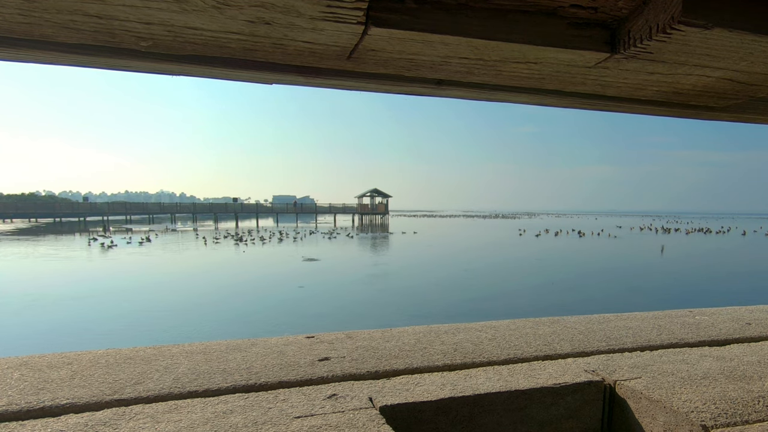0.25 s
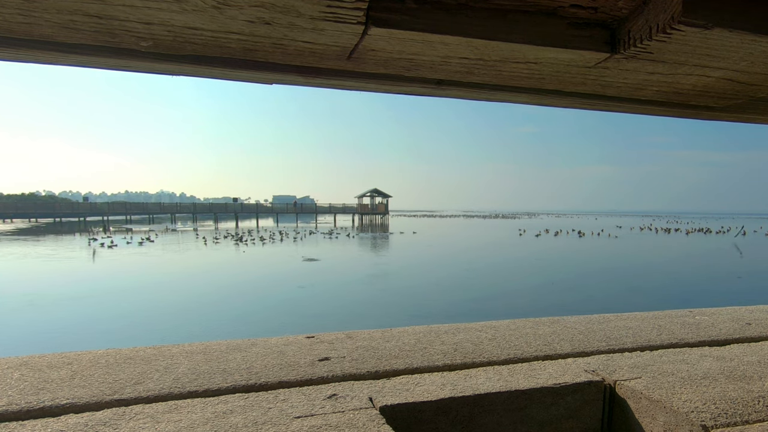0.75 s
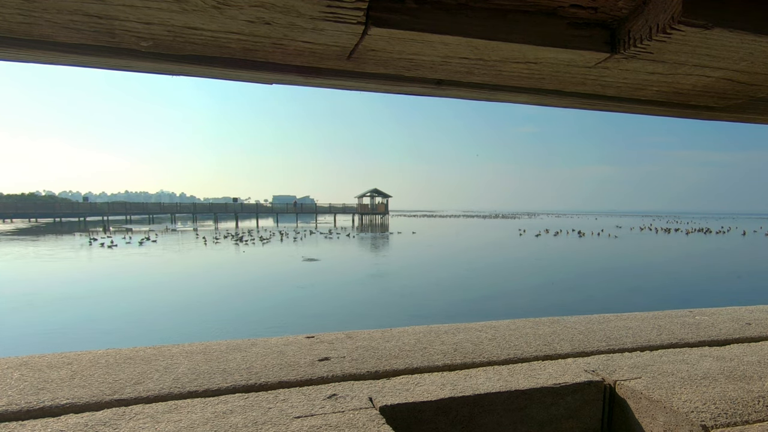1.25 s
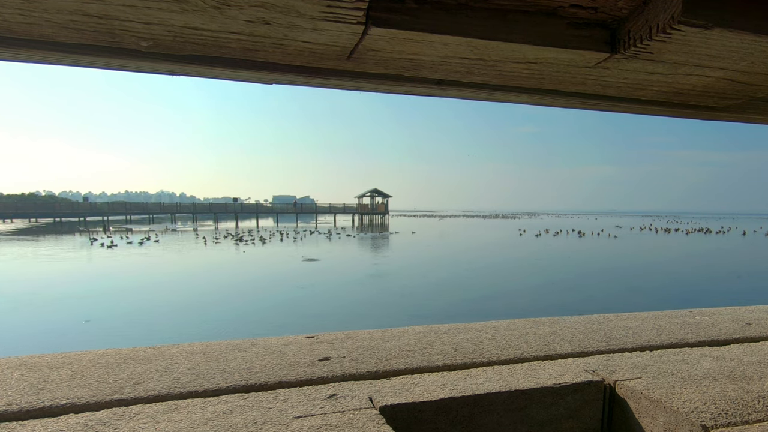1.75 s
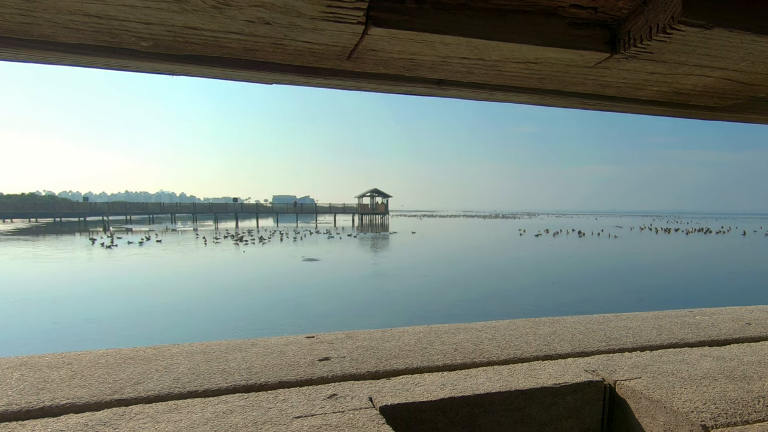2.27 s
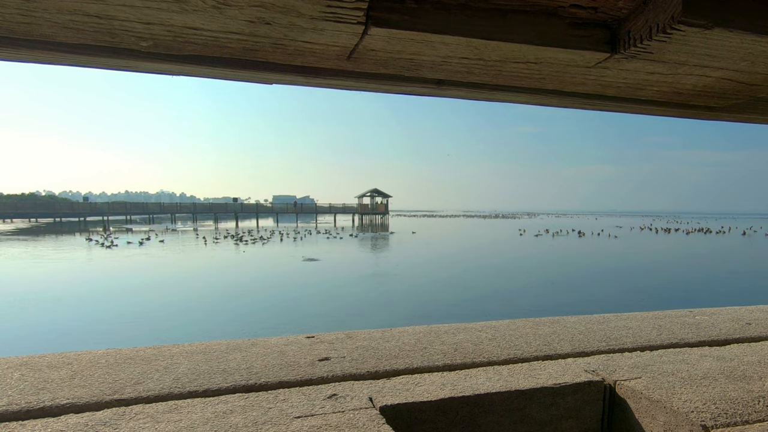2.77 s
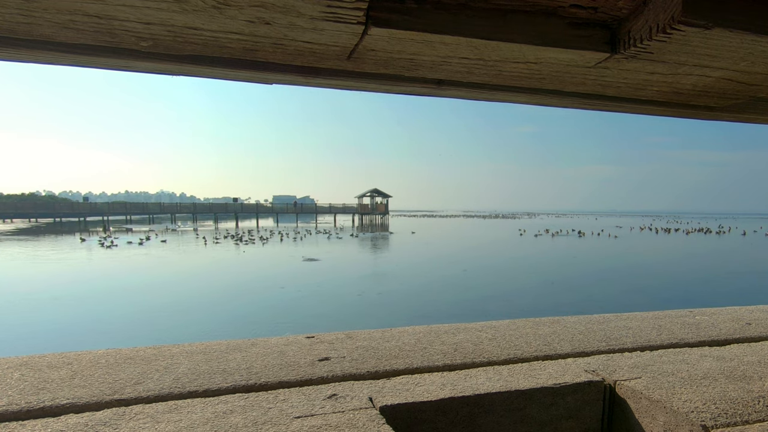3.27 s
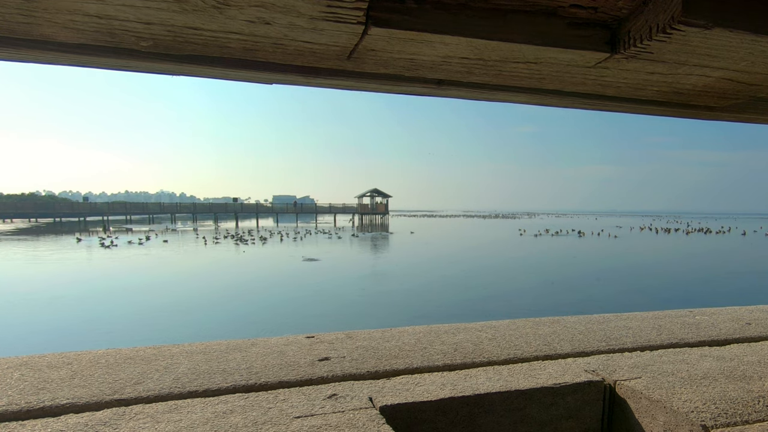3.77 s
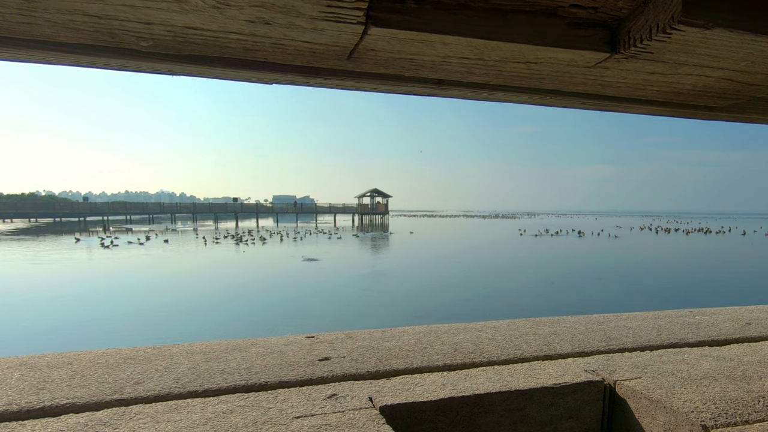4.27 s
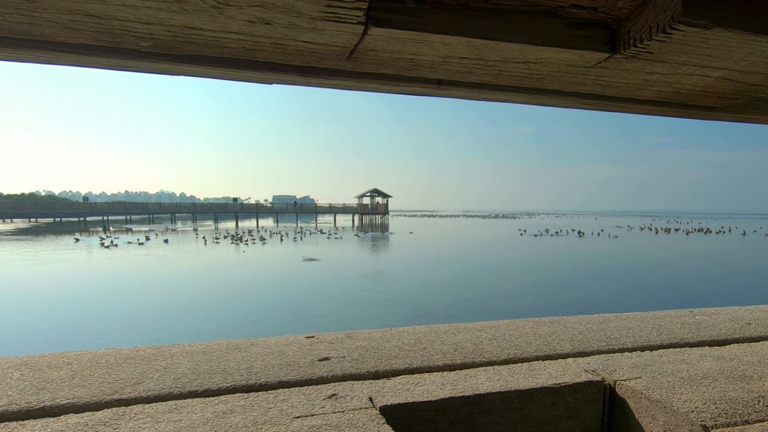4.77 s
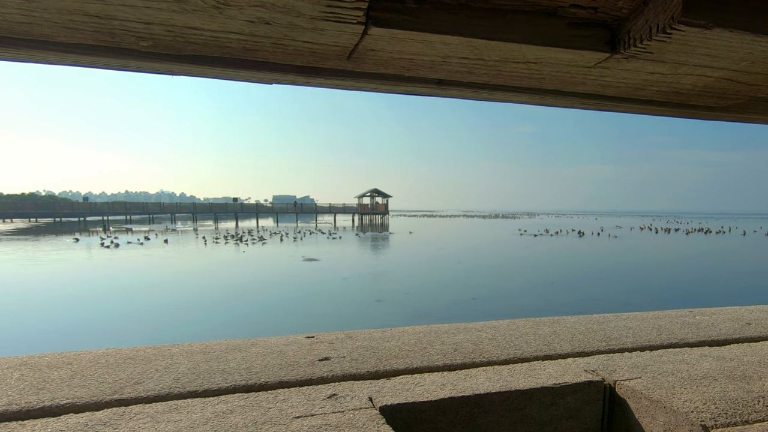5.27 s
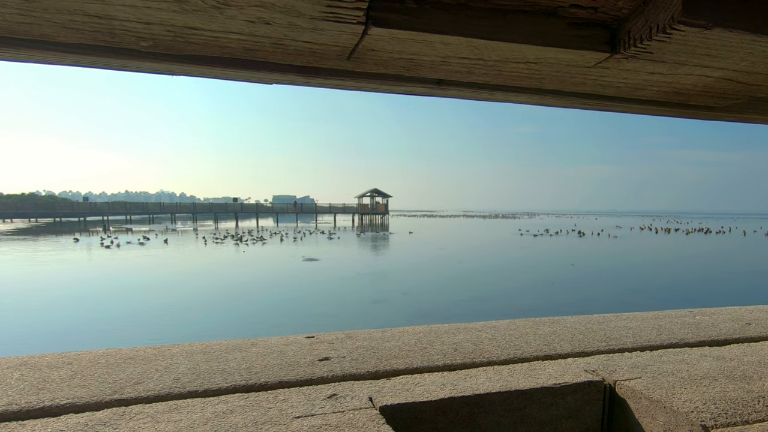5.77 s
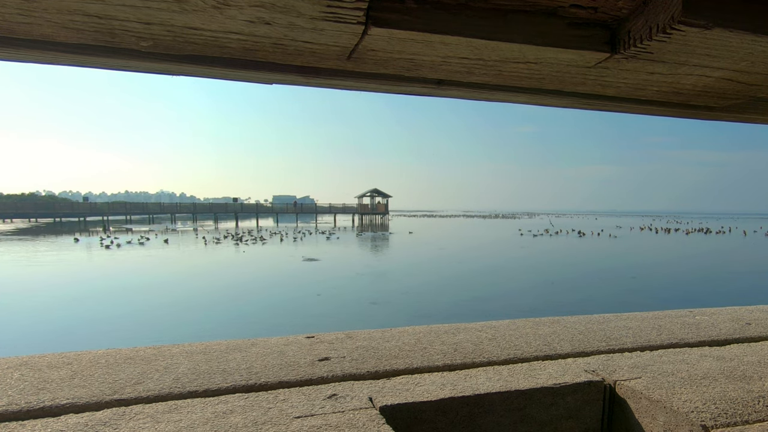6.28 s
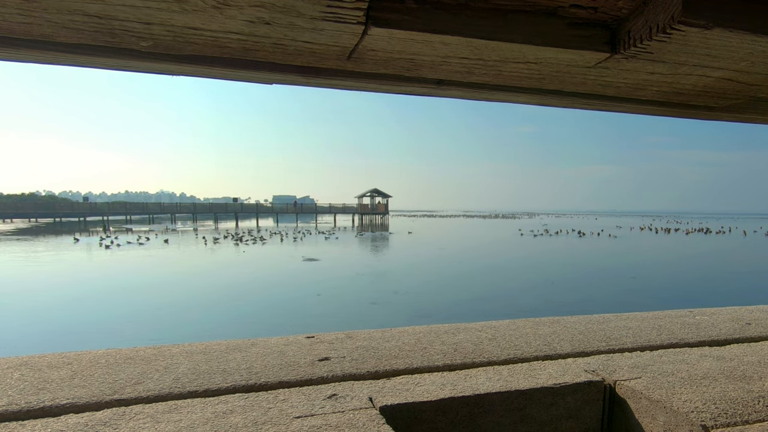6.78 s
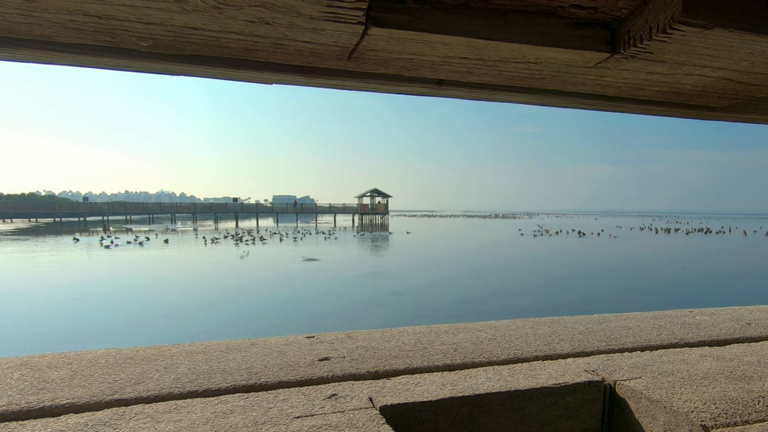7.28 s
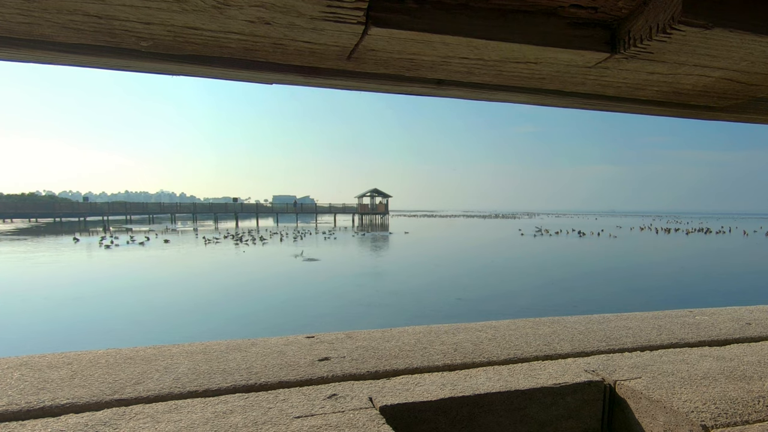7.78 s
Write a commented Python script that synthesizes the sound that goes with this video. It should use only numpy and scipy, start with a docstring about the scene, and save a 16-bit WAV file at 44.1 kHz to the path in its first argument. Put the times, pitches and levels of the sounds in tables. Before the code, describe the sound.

A low, far engine hum and rumble holds steady beneath an outdoor lagoon. Early on, a whistle with a squeak, a nasal mew and a rough two-part bird cry sound nearby, with slight echo. Timber close by ticks dryly from about two and a half to five seconds while a far motor rises in pitch. Later come three weak croaks, a thin gliding whistle and a single crisp snap. Gentle hiss and air sway continue.

```python
"""A calm lagoon, heard from a wooden shelter: water birds honk, mew, whistle and croak, built from wavering harmonics.
A run of dry ticks, like creaking timber, passes in the middle: short noise bursts strike resonances. Later comes one snap.
A distant engine drones as sine tones over low noise, and a far motor rises in pitch for a moment.
Light air sways on the microphone as very slow noise, with the even hiss of open water."""
import sys
import numpy as np
from scipy import signal
from scipy.fft import rfft, irfft
from scipy.io import wavfile
from scipy.ndimage import uniform_filter1d, map_coordinates

SR = 44100
rng = np.random.default_rng(int(sys.argv[2]) if len(sys.argv) > 2 else 0)


def store_wav(level_fs):
    """Save 16-bit WAV to argv[1]."""
    pcm = np.round(np.clip(np.atleast_2d(level_fs), -1, 1) * 32767)
    wavfile.write(sys.argv[1], SR, pcm.T.astype(np.int16))


N = 354299
TIME = np.arange(N) / SR  # seconds

# Bird notes, each one arch of pitch and breath. Each row: start in seconds, length in seconds, first, middle
# and last pitch in Hz, relative level in dB, fade over the note in dB, roughness from 0 to 1, voice name.
NOTES = [(0, 0.073, 420, 416, 432, -58.5, 1.5, 0.02, "nasal"),
         (0.079, 0.094, 474, 516, 530, -59.5, 8, 0.3, "yodel"),
         (0.087, 0.11, 2385, 2205, 2280, -46, 3.5, 0.22, "whistle"),
         (.14, 0.37, 720, 727, 653, -60.5, -1, 0.27, "mew"),
         (0.199, 0.11, 3753, 3714, 3700, -54, 10, 0.26, "squeak"),
         (1.336, 0.017, 464, 483, 503, -56, 0, .3, "yelp"),
         (1.36, 0.0455, 514, 515, 457, -40, 7, 0.22, "yelp"),
         (1.397, 0.07, 391, 352.4, 390, -56, 5, .4, "rasp"),
         (1.451, .122, 466, 492.4, 443, -45.5, 2, 0.15, "wail"),
         (1.62, .43, 1367, 1636, 1790, -57.5, 4, 0.45, "thin"),
         (2.185, 0.035, 454, 477, 463, -49.5, 3, 0.44, "honk"),
         (2.636, 0.15, 2005, 2195, 2250, -47, 8.5, 0.24, "whistle"),
         (2.772, 0.14, 3706, 3686, 3686, -54, 7, 0.1, "squeak")]
# Bird voices. Each list: relative level of harmonics 1, 2, 3 and so on, in dB.
NASAL_VOICE = [-9, -8, 1, 3, -6, -22, -7, -14]
YODEL_VOICE = [-17, 1, -22, -3, -24, -6]
HONK_VOICE = [-16, -3, 3, -2.5, -10, -12, -10, -30]
YELP_VOICE = [-26, -18, -20.5, -4, -20, -14, -21, -30, -28, -31, -33, -32]
RASP_VOICE = [-11, -9, -6, -10, -1.5, -5, -7, -3.5, -6, -20, -10, -14, -20, -26]
WAIL_VOICE = [-32, -8.5, -19, -1, -22, -11.5, -21, -21, -30, -21, -38, -15, -36, -33, -36, -31, -42, -24]
MEW_VOICE = [-14, 3.5, 5, -4, -14, -2, -20]
THIN_VOICE = [-0.5, -2.5, -40, -9]
WHISTLE_VOICE = [0.5, -15, -24.5, -31]
SQUEAK_VOICE = [-2.2, -6.5]
CROAK_VOICE = [-0.5, -1, -4, -6, -8, -12, -7, 0]
PURE_VOICE = [0]  # one harmonic only
# Throat resonances of the long mew, the rising mew and the croak.
# Each row: pitch in Hz, width in Hz, relative level in dB.
MEW_THROAT = [(1400, 70, 2.5), (2940, 310, 2.5), (4100, 630, -2.5)]
RISING_THROAT = [(1687, 47, 4.5), (3160, 1800, 2)]
CROAK_THROAT = [(563, 220, -2), (975, 190, 1.5), (2670, 500, -6)]
# Far croaks. Each row: start in seconds, length in seconds, top pitch in Hz, relative level in dB.
CROAKS = [(6.082, 0.063, 619, -48.5), (6.275, 0.084, 520.6, -53), (6.654, .085, 545.5, -50)]
# Two faint gliding whistles. Each row of a glide: time in seconds, pitch in Hz, relative level in dB.
GLIDES = [
    [(.5, 1440, -71), (.9, 1550, -84), (1.3, 1614, -70), (1.8, 1689, -69)],
    [(4.9, 1380, -72), (5.5, 1507, -73.5), (5.9, 1600, -69.5), (6.2, 1657, -69), (6.45, 1670, -75),
     (6.7, 1556, -67), (6.95, 1400, -78)],
]
# Echoes off the shelter and shore. Each row: delay in seconds, level in dB.
ECHOES = [(.004, -25), (0.019, -16), (.047, -14)]
# Strong timber ticks. Each row: time in seconds, relative level in dB, treble against the middle in dB.
STRONG_TICKS = [(2.4185, -51.5, -15), (2.5305, -43.5, -10), (2.6206, -46, -6), (2.716, -40.5, -10),
                (2.899, -43, -8), (3.0854, -40.5, -9), (3.277, -41, -10), (3.3796, -45.5, -9),
                (3.4811, -37.5, -12.5), (4.0567, -44, -7), (4.3097, -42.5, -10), (4.3994, -44, -7),
                (4.4884, -44.5, -6), (4.5803, -42, -9.5), (4.7664, -38.5, -7), (4.863, -43, -4),
                (4.9558, -42.5, -3.5), (5.0555, -43, -9), (5.159, -45, -7), (5.2728, -48.5, -13)]
# What the timber rings with. Each row: pitch in Hz, width in Hz, relative level in dB.
TIMBER = [(606, 330, 6.5), (980, 790, 4.5), (1400, 330, 3.5), (2200, 490, 4), (3150, 1080, 0.5),
          (4800, 750, 2), (7650, 960, 0)]
# One bright snap: time in seconds, relative level in dB.
SNAP = (6.336, -18)
# Distant engine, losing speed. Each row: time in seconds, speed as a multiple of nominal.
ENGINE_SPEED = [(0, 1.04), (3, 1), (6, .993), (8, 0.96)]
# Its two strong lines, each swelling once. Each row: pitch in Hz at nominal speed, resting level in dB before
# the fade, swell in dB, time of the swell in seconds, its half-width in seconds.
ENGINE_LINES = [(199.8, -47.5, 5.5, 3.73, 0.87), (178.4, -50, 8.5, 7.84, 0.99)]
# Its steady lines. Each row: pitch in Hz, level in dB.
HUM = [(91.5, -51), (120, -51.5), (148, -55), (286, -69)]
# A far motor gathering speed. Each row: time in seconds, pitch in Hz, level in dB.
FAR_MOTOR = [(3.3, 236, -66), (4.2, 260, -55.5), (4.8, 271.5, -57.5), (5.3, 272, -83)]
# Colour of the engine's rumble. Each row: frequency in Hz, relative level per Hz in dB.
RUMBLE = [(25, -2.5), (33, -8), (55, -3.5), (85, -3), (125, -1), (160, -3), (195, -6.5), (230, -10.5),
          (290, -13.5), (360, -20.5), (450, -24.5), (700, -29.5), (900, -32)]
# Puffs of air on the microphone. Each row: time in seconds, peak strength in dB, half-width in seconds.
PUFFS = [(.35, -22.5, 0.31), (1.5, -31.5, 0.66), (2.7, -17, 0.26), (3.45, -30, 0.34), (6.75, -27.5, .25)]
# Colour of the water's hiss. Each row: frequency in Hz, relative level per Hz in dB.
HISS = [(400, -7.5), (700, 2), (1000, -0.5), (1400, -4.5), (2000, -6.5), (3000, -8.5), (5400, -12),
        (6200, -8), (6900, -13), (10000, -15), (15800, -19)]

# The breath of a note is this much weaker at its two ends.
SLACK_DB = 4
# A rough note also wavers in pitch and is breathy, in these shares of its roughness.
JITTER_SHARE, BREATH_SHARE = 0.013, 0.5
# A croak starts and ends at this share of its top pitch.
CROAK_END_SHARE = 0.79
# Weak ticks keep the beat between the strong ones; their levels are relative too.
TICK_PERIOD_S, WEAK_TICK_DB, WEAK_SPREAD_DB, WEAK_TREBLE_DB = 0.096, -50, 2.5, -7.5
# The timber rustles around each tick: relative level, and half-width in time.
STIRRING_DB, STIRRING_S = -21.5, 0.19
# The two strong lines sink as the engine draws away.
LINE_FADE_DB_PER_S = 0.46
# The rumble's level at the start, and how fast it recedes.
RUMBLE_DB, RECEDE_DB_PER_S = -42, 0.14
# The air's sway between puffs.
CALM_DB = -40
CUTOFF_HZ = 15900


def near_birds():
    """Rough nasal calls, mews shaped by a throat, and clean whistles that break into a higher squeak."""
    honks = notes("nasal", NASAL_VOICE) + notes("yodel", YODEL_VOICE)
    honks += notes("honk", HONK_VOICE, unsteady=1.3)

    # the cry drops into a low rasp between its two syllables
    cry = notes("yelp", YELP_VOICE, unsteady=1.1)
    cry += notes("rasp", RASP_VOICE, unsteady=1.7)
    cry += notes("wail", WAIL_VOICE, unsteady=1.6)
    # turbulence in the open bill follows the force of the cry, averaged over 50 ms
    force = np.sqrt(np.abs(uniform_filter1d(cry ** 2, size=2205)))
    turbulence = coloured([(900, 1), (1800, -3), (3200, -2), (4500, -16), (7000, -22)])
    cry += from_db(-13) * force * turbulence

    mews = throat(notes("mew", MEW_VOICE, unsteady=0.81), MEW_THROAT)
    # the rising mew's lowest harmonic grows strong as it climbs into a throat resonance
    mews += throat(notes("thin", THIN_VOICE, unsteady=0.94), RISING_THROAT)

    whistles = notes("whistle", WHISTLE_VOICE, unsteady=0.79)
    whistles += notes("squeak", SQUEAK_VOICE, unsteady=0.19)
    return honks + cry + mews + whistles


def far_birds():
    """Hoarse croaks arch in pitch and strength together; a thin gliding whistle sounds twice."""
    croaks = np.zeros(N)
    for start, length, top_hz, db in CROAKS:
        end_hz = CROAK_END_SHARE * top_hz
        curve = arch(start, length, [end_hz, top_hz, end_hz], db)
        croaks += call(curve, CROAK_VOICE, jitter=0.017, rasp=0.5, breath=0.39)
    whistles = sum(call(glide, PURE_VOICE, jitter=0.00712, rasp=0.38) for glide in GLIDES)
    return throat(croaks, CROAK_THROAT) + from_db(1.5) * whistles


def notes(name, voice, unsteady=1):
    """All notes sung in one voice; roughness sets flutter, waver and breath together."""
    out = np.zeros(N)
    for start, length, first, middle, last, db, fade_db, rough, sung in NOTES:
        if sung == name:
            curve = arch(start, length, [first, middle, last], db, fade_db)
            jitter = unsteady * JITTER_SHARE * rough
            out += call(curve, voice, jitter=jitter, rasp=rough, breath=BREATH_SHARE * rough)
    return out


def arch(start, length, pitches, db, fade_db=0):
    """One note as rows of time, Hz and dB: pitch bends through three points; breath swells, slackens and fades."""
    along = np.linspace(-1, 1, 25)
    seconds = start + length * (along + 1) / 2
    hz = np.polyval(np.polyfit([-1, 0, 1], pitches, 2), along)
    level_db = db - SLACK_DB * along ** 2 - fade_db * along / 2
    return np.column_stack([seconds, hz, level_db])


def call(curve, voice, jitter=0.003, rasp=0.1, breath=0.072, edge_s=0.005, wander=0.804):
    """A bird's voice organ: harmonics on one trembling, wandering pitch, each roughened by flutter and turbulence."""
    start, end = curve[0][0], curve[-1][0]
    span = (TIME > start - edge_s) & (TIME < end + edge_s)
    t = TIME[span]
    hz, db = in_time(curve, t)
    unsteady = drift(150, len(t)) + wander * drift(10, len(t))
    phase = 2 * np.pi * np.cumsum(hz * (1 + jitter * unsteady)) / SR
    tone = np.zeros(len(t))
    for k, level in enumerate(voice, 1):
        flutter = 1 + rasp * drift(120, len(t)) + breath * drift(700, len(t))
        tone += from_db(level) * np.sin(k * phase) * flutter
    # fade in and out so the edges do not click
    gate = np.clip((np.minimum(t - start, end - t) + edge_s) / (2 * edge_s), 0, 1)
    out = np.zeros(N)
    out[span] = np.sqrt(2) * tone * gate * from_db(db)
    return out


def throat(x, resonances):
    """A throat as resonances side by side, their signs alternating."""
    out = np.zeros(N)
    for k, (hz, width, db) in enumerate(resonances):
        out += (-1) ** k * from_db(db) * resonate(x, hz, width)
    return out


def tick_train():
    """The strong ticks, and weak ones evenly spaced in every gap: rows of time, dB and treble dB."""
    rows = list(STRONG_TICKS)
    for before, after in zip(STRONG_TICKS, STRONG_TICKS[1:]):
        beats = max(1, round((after[0] - before[0]) / TICK_PERIOD_S))
        for s in np.linspace(before[0], after[0], beats + 1)[1:-1]:
            db = WEAK_TICK_DB + WEAK_SPREAD_DB * rng.standard_normal()
            rows.append((s, db, WEAK_TREBLE_DB))
    return rows


def ticks(train, tick_db=27, top_hz=9500, crumble_s=0.0023, rattle_s=0.025, rattle_share=0.73):
    """Timber gives about ten times a second: a sharp slip, smaller ones and reflections strike its resonances."""
    s, db, treble_db = np.transpose(train)
    t = np.arange(3000) / SR
    clusters = np.zeros((len(s), len(t)))
    clusters[:, 0] = 0.75  # the sharp first slip
    for decay_s, share in [(crumble_s, 0.9), (rattle_s, rattle_share)]:
        burst = rng.standard_normal(clusters.shape) * np.exp(-t / decay_s)
        clusters += share * burst / np.linalg.norm(burst, axis=1, keepdims=True)
    at = (s * SR).astype(int)[:, None] + np.arange(len(t))
    out = np.zeros(N)
    for k, (hz, width, mode_db) in enumerate(TIMBER):
        # the treble setting acts only on resonances above 4 kHz
        strike_db = db + mode_db + treble_db * (hz > 4000)
        slips = np.zeros(N)
        slips[at] = clusters * from_db(strike_db)[:, None]
        out += (-1) ** k * resonate(slips, hz, width)
    soften = signal.butter(2, min(top_hz, 0.45 * SR), fs=SR, output="sos")
    return from_db(tick_db) * signal.sosfilt(soften, out)


def stirring(train):
    """Faint scattered grains around the ticks ring briefly at their own pitches; harder ticks stir more."""
    strain = np.sqrt(sum(from_db(db) ** 2 * swell(s, STIRRING_S) for s, db, _ in train))
    pitches = np.geomspace(400, 2000, 12)
    grains = (rng.random(N) < 400 / SR) * rng.standard_normal(N)  # about 400 a second
    dealt = rng.integers(0, len(pitches), N)  # which pitch each grain gets
    rustle = np.zeros(N)
    for k, hz in enumerate(pitches):
        rustle += resonate(grains * (dealt == k), hz, hz / 6) / hz
    return from_db(STIRRING_DB) * strain * rms_one(rustle)


def snap():
    """A single click rings two high resonances, with a diffuse reflection just after it."""
    seconds, db = SNAP
    click = np.zeros(N)
    click[int(seconds * SR)] = from_db(db)
    direct = resonate(resonate(click, 6100, 2600), 7800, 2600) * from_db(7.5)
    reflection = scatter(direct, t60=0.12, wet_db=-0.5) - direct
    return direct + np.roll(reflection, int(0.013 * SR))


def engine():
    """Far machinery: two slowing lines swell in turn over steady hum and rumble; a far motor rises in pitch."""
    speed, = in_time(ENGINE_SPEED)
    lines = list(HUM)
    for hz, db, swell_db, s, width in ENGINE_LINES:
        level_db = db + swell_db * swell(s, width) - LINE_FADE_DB_PER_S * TIME
        lines.append((hz * speed, level_db))
    tones = np.zeros(N)
    for hz, db in lines:
        phase = 2 * np.pi * np.cumsum(hz + 0.336 * drift(1.5)) / SR
        tones += from_db(db) * np.sin(phase)
    motor = call(FAR_MOTOR, PURE_VOICE, jitter=0.0082, rasp=0.16)
    rumble = from_db(RUMBLE_DB - RECEDE_DB_PER_S * TIME) * coloured(RUMBLE)
    return np.sqrt(2) * tones + motor + rumble


def air():
    """Slow pressure swings on the microphone, in a few puffs, and the even hiss of open water."""
    strength = from_db(CALM_DB) + sum(from_db(db) * swell(s, width) for s, db, width in PUFFS)
    sway = coloured([(1.5, 1), (3.5, -4.0), (7, -8), (12, -39), (25, -38.5)])
    return strength * sway + from_db(-58.5) * coloured(HISS)


def from_db(db):
    """Decibels to gain."""
    return 10 ** (np.asarray(db) / 20)


def rms_one(x):
    """Scale to unit power."""
    return x / np.sqrt(np.mean(x ** 2) + 1e-20)


def in_time(rows, t=TIME):
    """Each column of a curve, read at times t."""
    s, *columns = np.transpose(rows)
    return [np.interp(t, s, c) for c in columns]


def swell(s, half_width_s):
    """A smooth rise and fall of height 1 around time s; it is down to 1/e at the half-width."""
    return np.exp(-((TIME - s) / half_width_s) ** 2)


def drift(rate, size=N):
    """Smooth random wandering around zero at about the given rate in Hz, with a spread of about 1."""
    knots = rng.standard_normal(int(size / SR * 2 * rate) + 4)
    places = np.arange(size) / SR * 2 * rate + 1
    return map_coordinates(knots, [places], order=2, mode="nearest")


def coloured(spectrum):
    """Unit-power noise with the given spectrum, falling away beyond its ends."""
    hz, db = np.transpose(spectrum)
    f = np.maximum(np.arange(N // 2 + 1) * SR / N, 1e-3)
    ends = np.minimum(f / hz[0], 1) ** 2 * np.minimum(hz[-1] / f, 1) ** 2
    gain = ends * from_db(np.interp(np.log(f), np.log(hz), db))
    return rms_one(irfft(rfft(rng.standard_normal(N)) * gain, N))


def resonate(x, hz, width):
    """A resonance with about unit gain at its top; a narrower one rings longer."""
    r = np.exp(-np.pi * width / SR)
    top = np.array([1, 0, -1]) * (1 - r * r) / 2
    ring = [1, -2 * r * np.cos(2 * np.pi * hz / SR), r * r]
    return signal.lfilter(top, ring, x + 1e-18)


def scatter(x, t60, wet_db):
    """The sound plus a cloud of reflections that falls 60 dB in t60 seconds."""
    t = np.arange(SR) / SR
    tail = rng.standard_normal(SR) * from_db(-60 * t / t60)
    cloud = signal.fftconvolve(x, tail / np.linalg.norm(tail))[:N]
    return x + from_db(wet_db) * cloud


def scene():
    """Calls reach the shelter with a few echoes and a faint tail; all other sounds join them."""
    birds = near_birds() + far_birds()
    echoes = sum(from_db(db) * np.interp(TIME - s, TIME, birds, left=0) for s, db in ECHOES)
    birds = scatter(birds + echoes, t60=0.35, wet_db=-13)
    train = tick_train()
    timber = ticks(train) + stirring(train)
    return (birds + timber + snap() + engine() + air())[None]


def record(dry):
    """A steep low-pass filter removes the very top."""
    low_pass = signal.ellip(12, 0.1, 80, CUTOFF_HZ, fs=SR, output="sos")
    return signal.sosfilt(low_pass, dry)


dry = scene()
out = record(dry)
store_wav(out)
```